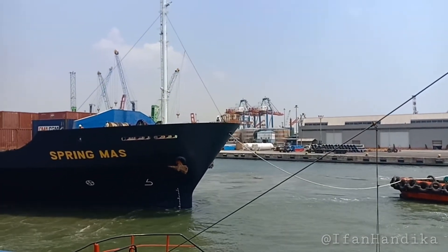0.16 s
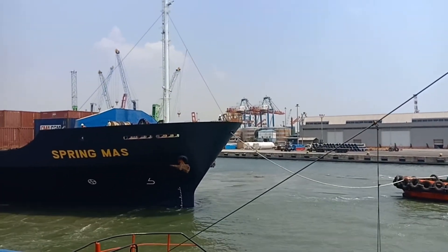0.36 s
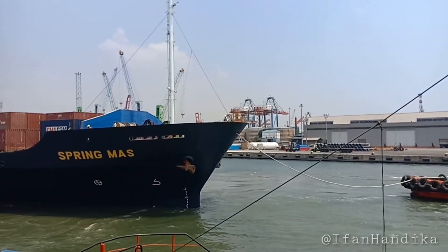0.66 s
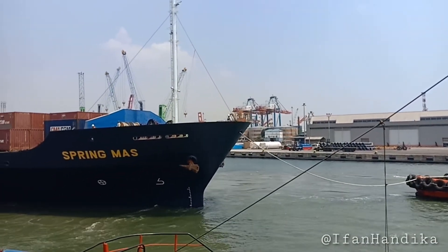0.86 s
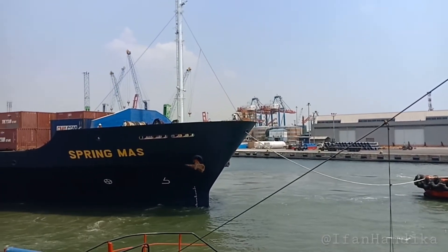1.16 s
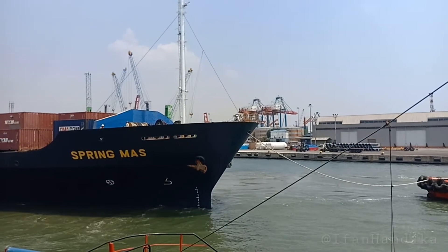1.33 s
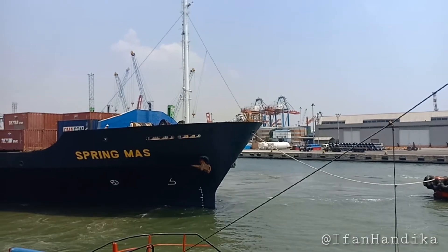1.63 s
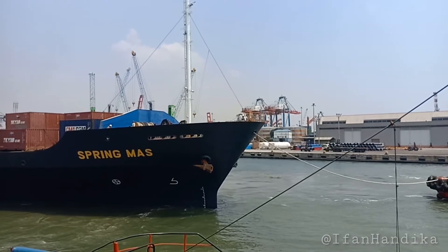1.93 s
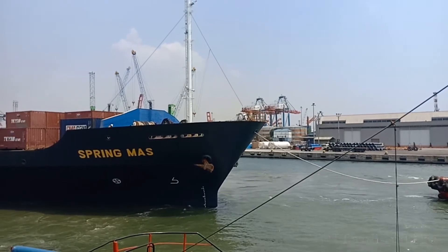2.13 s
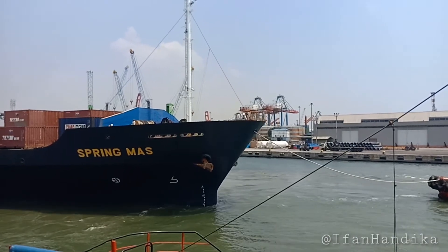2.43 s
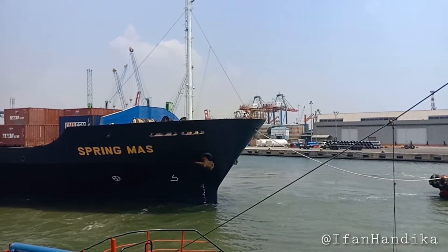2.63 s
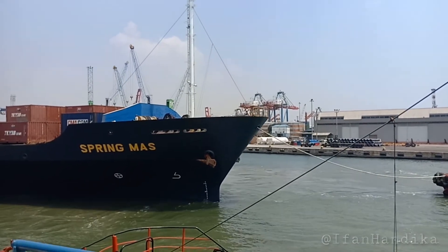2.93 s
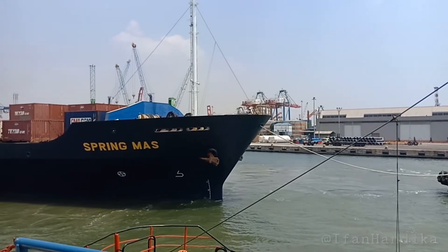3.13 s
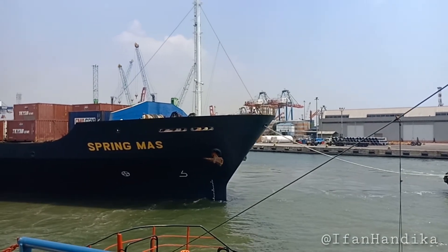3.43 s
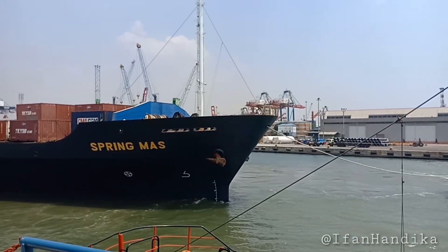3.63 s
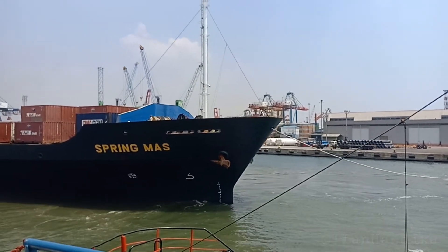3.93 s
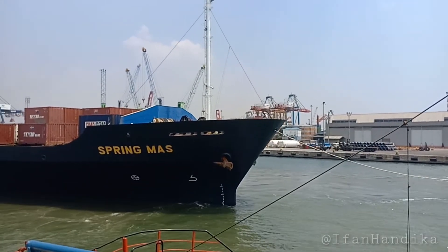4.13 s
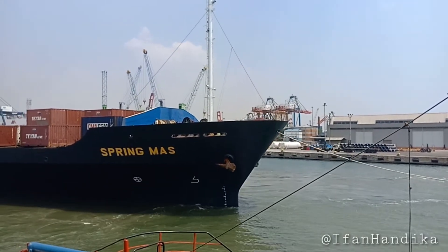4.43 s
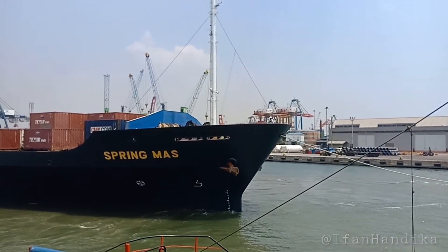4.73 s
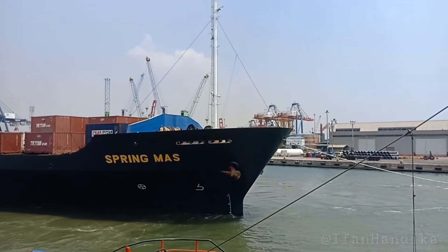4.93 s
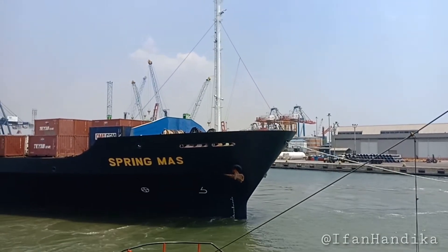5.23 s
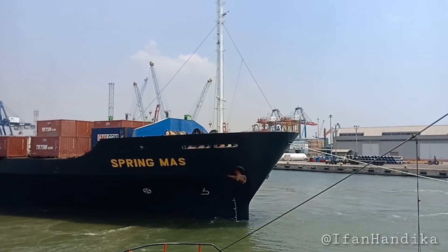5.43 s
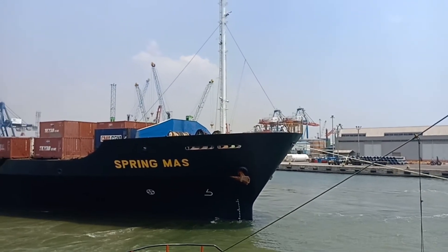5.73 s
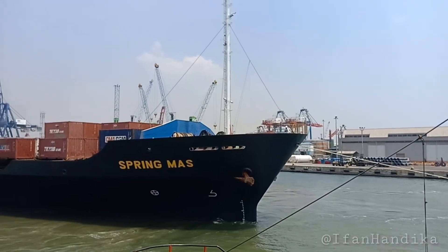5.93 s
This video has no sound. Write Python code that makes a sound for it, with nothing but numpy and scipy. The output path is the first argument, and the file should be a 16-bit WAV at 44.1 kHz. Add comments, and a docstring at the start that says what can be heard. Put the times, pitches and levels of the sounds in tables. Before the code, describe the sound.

A low drone of ship diesels carries on from start to finish under an even, rushing wash of exhaust, fans and stirred harbour water. The engines rise and fall gently against one another, with faint machinery whines behind them. A single higher hum surfaces twice in the second half and sinks back. Heard through a phone on the water, the engines sit in the middle and the noise spreads wide, with a light hiss on top.

```python
"""Big diesels run steadily around a harbour tug, their exhausts droning on clean engine orders near 100 Hz.
Two engines swell and beat against each other; two more stand farther off, among faint pumps and fans.
An even roar of exhaust gas, fans and churned water lies over them, coloured by funnels and deck plating.
The microphone is a phone: two ports 16 cm apart, each with its own resonances in the treble."""
import sys
import numpy as np
from scipy import signal
from scipy.fft import rfft, irfft
from scipy.io import wavfile
from scipy.ndimage import uniform_filter1d

SR = 44100
rng = np.random.default_rng(int(sys.argv[2]) if len(sys.argv) > 2 else 0)


def to_wav(sig):
    """Store sig (one row per channel, or 1-D mono) as 16-bit WAV at the path in sys.argv[1].

    Samples outside -1..1 are clipped; the rate is SR.
    """
    pcm = np.clip(np.atleast_2d(sig), -1, 1) * 32767
    pcm = np.round(pcm).astype(np.int16)
    wavfile.write(sys.argv[1], SR, pcm.T)  # frames by channels


N = 267246
TIME = np.arange(N) / SR
HZ = np.maximum(np.arange(N // 2 + 1) * SR / N, 1)

# working cycles or firings a second of the four engines
MAIN_HZ, SECOND_HZ, THIRD_HZ, FOURTH_HZ = 8.4335, 36.11, 9.742, 19.67
# what each exhaust radiates: (multiple of that rate, level [dB])
MAIN_ORDERS = [(6, -59), (7, -65), (9, -58), (12, -36.5), (13, -57), (14, -57), (15, -41), (16, -49),
               (18, -62), (20, -50.5), (28, -58), (41, -60), (44, -56), (48, -63), (64, -60)]
SECOND_ORDERS = [(1, -74), (2, -50), (3, -44.5), (4, -55), (8, -60)]
THIRD_ORDERS = [(7, -65), (9, -58), (12, -49), (16, -54), (25, -58)]
FOURTH_ORDERS = [(10, -53), (12, -59), (13, -56)]
# the main engine swells as air and water carry it to the microphone: (time [s], gain [dB])
MAIN_GAIN = [(0, 0), (.5, -0.5), (1.5, 0.5), (2.5, -0.5), (3.5, 1), (4.2, 2), (5, -2), (5.5, -0.5),
             (6.06, 2.5)]
# the second engine rises and falls: (time [s], gain [dB])
SECOND_GAIN = [(0, 0), (.6, -1), (.9, -1), (1.5, 1), (2.0, 4), (2.4, 4), (3.0, 0), (3.6, 2), (3.95, -1),
               (4.25, 2), (4.55, 0), (5.0, 0), (5.7, -13), (6.06, -1)]
# the roar before it reaches the ports: (frequency [Hz], relative level [dB])
ROAR_SPECTRUM = [(25, -33), (45, -21), (60, -8), (70, -13), (95, 0.5), (112, 1), (135, -3.5), (180, -9),
                 (320, -6), (600, -11), (850, -14), (1150, -17), (3300, -31), (7000, -41), (9600, -56),
                 (15500, -58)]
# resonances of funnels and deck plating: (frequency [Hz], width [Hz], lift [dB])
HULL_MODES = [(144, 10, 2.5), (176, 14, 4.5), (200, 14.4, 5), (265, 14, 1.5), (316, 22, 2), (435, 27, 1.5),
              (533, 20, 3), (624, 17, 2), (742, 40, 3), (809, 22, 5), (846, 22, 3), (900, 27, 4),
              (1340, 50, 1.5), (1410, 30, 2)]
# swells of the lower roar: (time [s], rumble near 400 Hz [dB], hollow band near 800 Hz [dB])
LOW_SWELLS = [(0, 1, -2), (.4, 1.5, 1.5), (.5, 4.5, 1.1), (.63, -1, -0.5), (1.12, -0.8, 0), (1.21, 5, -2),
              (1.32, -3.5, 2), (1.47, -4, 0.5), (1.7, -1, 0.5), (2.0, -2.5, 1.5), (2.35, 1, -0.5),
              (2.6, -3.5, 1), (3.05, -0.5, 0), (3.4, -2, 0.5), (3.85, 1.5, 1), (4.35, -3, -0.5),
              (4.55, -0.5, 0), (4.9, -2, 0.5), (5.12, 2.2, -1.2), (5.22, 3.5, -0.5), (5.36, 0.5, -2.5),
              (5.47, -4, 1.5), (5.75, 0, -.5), (6.06, 0, 2)]
# swells of the upper roar: (time [s], rasp near 2 kHz [dB], hiss above 5 kHz [dB])
HIGH_SWELLS = [(0, 0, 2.5), (.5, 0, 3), (.84, 0.5, 2.5), (.93, 2.5, 3), (1.02, 0, 2), (1.1, -0.5, 4.5),
               (1.22, 1.2, 2.5), (1.55, -2, 0.5), (1.95, 0, 2.5), (2.2, 0.5, 1.5), (2.4, 0.5, 3.5),
               (2.8, 0, 2), (3.1, -0.2, 3.8), (3.6, 0.5, 2.5), (3.9, .5, 2.5), (4.35, 1, 1.5),
               (4.65, 0.5, 1), (4.76, 2, 2), (4.9, -1.5, 1), (5.13, 1, 2), (5.17, 3.5, 0.5),
               (5.21, 3.5, 1.5), (5.26, 1.5, 0.5), (5.45, -0.5, 1), (5.6, 0, 1.5), (6.06, 0.5, 1.5)]
# a hum that comes and goes: (time [s], level [dB])
HUM_LEVEL = [(0, -64), (3.3, -63), (3.7, -48), (4, -61), (4.4, -45.5), (4.8, -45), (5.1, -61),
             (6.06, -57.5)]
# pumps, fans and gears, two matching lists: (frequency [Hz]) and (level [dB])
MACHINE_HZ = [46.4, 75.08, 91.42, 150.04, 308, 605, 732.2, 806.9, 887.9, 1556, 1613.7, 1780, 2220]
MACHINE_DB = [-64, -54, -58, -56, -57, -65, -64, -63, -65, -76, -72, -74, -75]
# the phone's body makes the ports more or less alike: (frequency [Hz], width [Hz], added correlation)
PHONE_BODY = [(380, 220, 0.05), (846, 170, 0.23), (1160, 160, -0.24), (1730, 180, -0.24), (2170, 300, 0.52),
              (5290, 110, 0.6)]
# resonances of the microphone ports: (frequency [Hz], width [Hz], lift [dB])
LEFT_MODES = [(2170, 620, 8), (2750, 280, 3.5), (3930, 330, 5), (5070, 720, 4.5), (6000, 650, 10.5),
              (8360, 260, 4.5), (10300, 400, 6.5), (11400, 700, 4), (13700, 800, 6), (14900, 700, 2)]
RIGHT_MODES = [(400, 150, 0.72), (1410, 290, 1.16), (2165, 682, 13.1), (2765, 250, 6.2),
               (5105, 1010, 11.56), (8400, 340, 2.5), (10370, 330, 7.4), (11350, 670, 8.8),
               (13700, 900, 7.4), (14900, 700, 4)]


def engine(hz, orders, hunt, waver_db):
    """Sines locked to one crank; the governor hunts by a share of the speed, orders waver in the air."""
    crank = 2 * np.pi * hz * np.cumsum(1 + hunt * walk(1.515)) / SR
    sound = 0
    for order, db in orders:
        amplitude = np.sqrt(2) * undb(db + waver_db * walk(2.475))
        sound += amplitude * np.sin(order * crank + rng.uniform(0, 2 * np.pi))
    return sound


def near_diesels():
    """The two loudest exhausts, each swelling on its own and beating against the other."""
    main = engine(MAIN_HZ, MAIN_ORDERS, hunt=0.00071, waver_db=0.21)
    second = engine(SECOND_HZ, SECOND_ORDERS, hunt=0.00085, waver_db=0.88)
    return undb(over_time(MAIN_GAIN)) * main + undb(over_time(SECOND_GAIN)) * second


def far_diesels():
    """Two exhausts farther off, fainter and wavering more at the microphone."""
    third = engine(THIRD_HZ, THIRD_ORDERS, hunt=0.00109, waver_db=3.5)
    fourth = engine(FOURTH_HZ, FOURTH_ORDERS, hunt=0.00062, waver_db=1.3)
    return third + fourth


def roar(level_db=-33.5):
    """An even roar in half-octave bands that swell; the top flickers slightly, as in compressed audio."""
    hz, db = np.transpose(ROAR_SPECTRUM)
    colour_db = np.interp(np.log(HZ), np.log(hz), db) + bumps(HULL_MODES)
    spectra = undb(colour_db) * noise_from_all_sides()
    spectra *= undb(level_db) / np.sqrt(np.mean(irfft(spectra, N) ** 2))
    swells_db = np.array([over_time(table, col) for table in (LOW_SWELLS, HIGH_SWELLS) for col in (1, 2)])
    swells_db -= swells_db.mean(axis=1, keepdims=True)
    # each swell rules around its own pitch and fades towards the next; none reaches below 180 Hz
    swell_octaves = np.log2([180, 380, 800, 2200, 5300])
    sound = 0
    for octave in np.arange(4.5, 14.5, 0.5):
        band = np.clip(1 - 2 * abs(np.log2(HZ) - octave), 0, 1)
        weights = [np.interp(octave, swell_octaves, row) for row in np.eye(5)[1:]]
        flicker_db = np.interp(octave, [12.7, 13.7], [0.4, 1.1]) * walk(18)
        sound += undb(weights @ swells_db + flicker_db) * irfft(band * spectra, N)
    return sound


def noise_from_all_sides(spacing_m=0.16):
    """Noise spectra at the two ports, alike as the sinc of their spacing in half wavelengths."""
    half_wavelength_m = 343 / HZ / 2
    open_air = np.sinc(spacing_m / half_wavelength_m)
    alike = np.clip(0.94 * open_air + bumps(PHONE_BODY), -0.999, 0.999)
    left, independent = rfft(rng.standard_normal((2, N)))
    right = alike * left + np.sqrt(1 - alike ** 2) * independent
    return np.array([left, right])


def passing_hum(hz=315):
    """A single tone that comes and goes above the drone."""
    return engine(hz, [(1, over_time(HUM_LEVEL))], hunt=0.00308, waver_db=1.4)


def small_machines():
    """Pumps, fans and gears in the background, each turning on its own with one faint hum or whine."""
    return sum(engine(hz, [(1, db)], hunt=0.000556, waver_db=2) for hz, db in zip(MACHINE_HZ, MACHINE_DB))


def walk(rate):
    """Random levels held 1 / rate s and slewed twice; spread near 1."""
    hold = int(SR / rate)
    steps = np.repeat(rng.standard_normal(N // hold + 1), hold)
    return 1.373 * uniform_filter1d(uniform_filter1d(steps, hold), hold)[:N]


def over_time(table, column=1):
    """One column of a timed table, read at every sample."""
    columns = np.transpose(table)
    return np.interp(TIME, columns[0], columns[column])


def bumps(modes):
    """Bell-shaped lifts, summed at every frequency."""
    return sum(lift * np.exp(-2 * ((HZ - hz) / width) ** 2) for hz, width, lift in modes)


def undb(db):
    """Decibels to gain."""
    return 10 ** (np.asarray(db) / 20)


def scene(right_lead_db=0.7):
    """The harbour from where the phone stands: drone in the centre, roar all round, the right louder."""
    drone = passing_hum() + near_diesels() + far_diesels() + small_machines()
    balance = undb([[-right_lead_db / 2], [right_lead_db / 2]])
    return (drone + roar()) * balance


def record(dry):
    """The phone: both ends ease over 4 ms, the air in each port resonates, the top is cut at 15.48 kHz."""
    fade = np.clip(np.minimum(TIME, TIME[::-1]) / 0.004, 0, 1)
    port_gain = undb([bumps(LEFT_MODES), bumps(RIGHT_MODES)])
    at_ports = irfft(rfft(dry * fade) * port_gain, N)
    top_cut = signal.ellip(16, 0.3, 60, 15480, fs=SR, output="sos")
    return signal.sosfilt(top_cut, at_ports)


dry = scene()
out = record(dry)
to_wav(out)
```